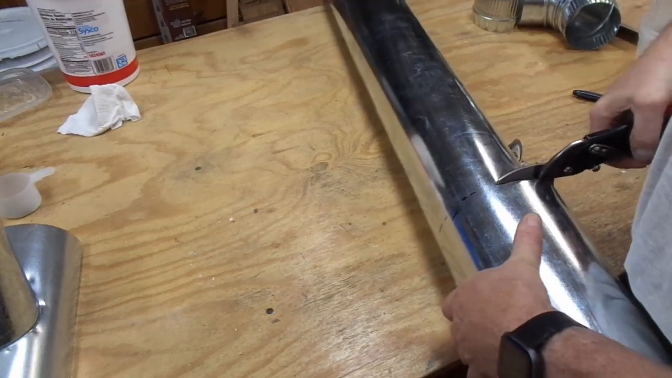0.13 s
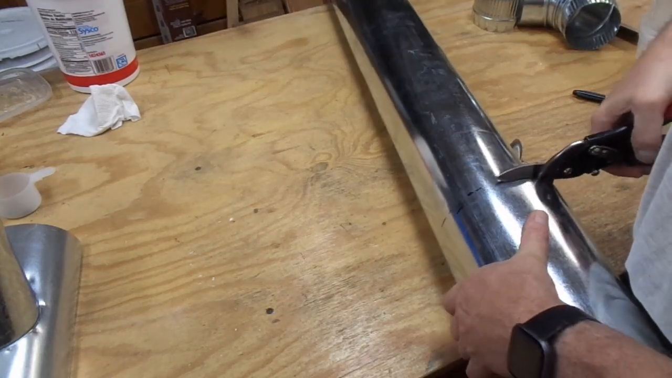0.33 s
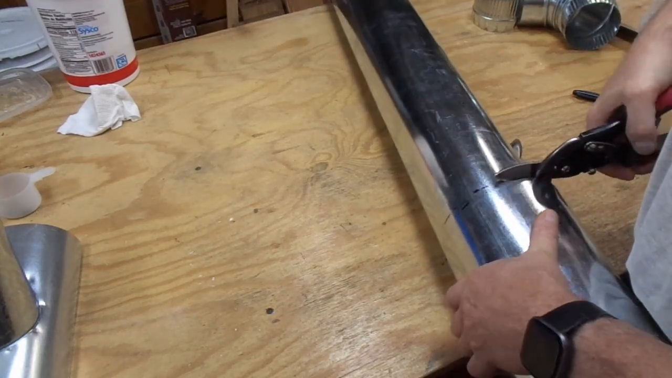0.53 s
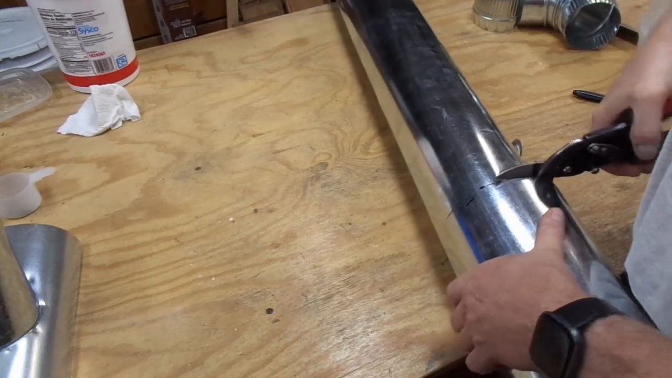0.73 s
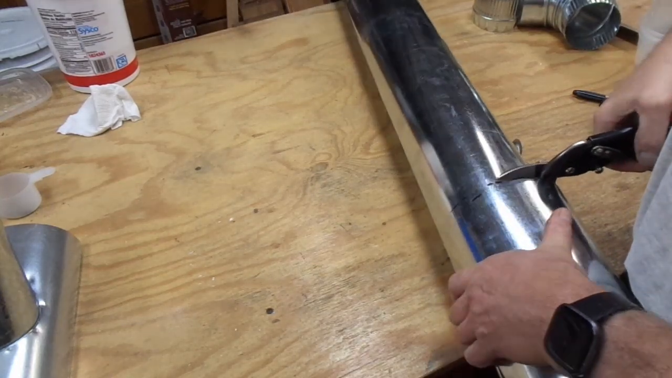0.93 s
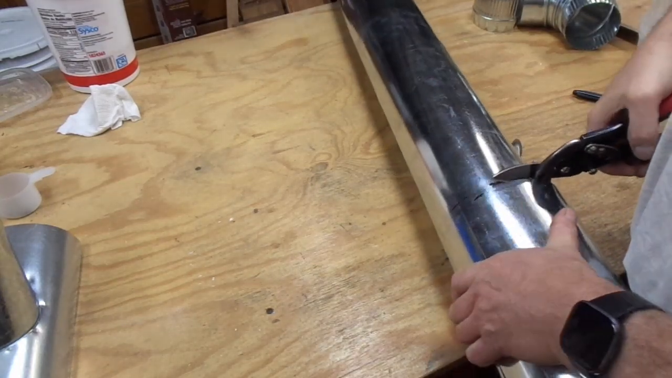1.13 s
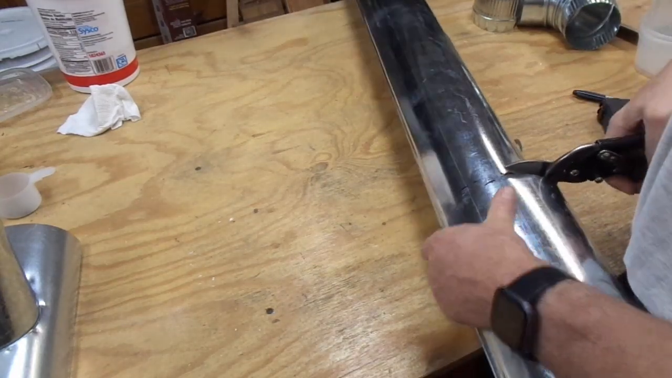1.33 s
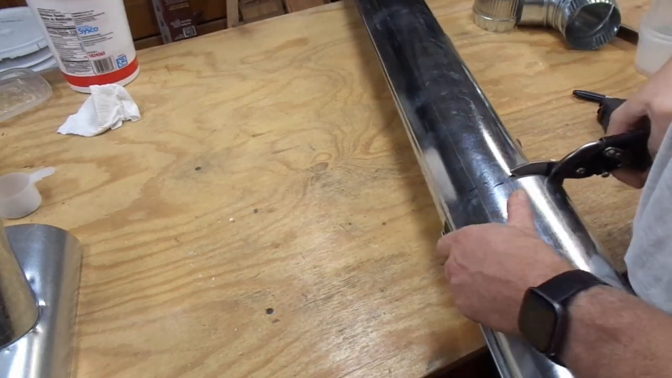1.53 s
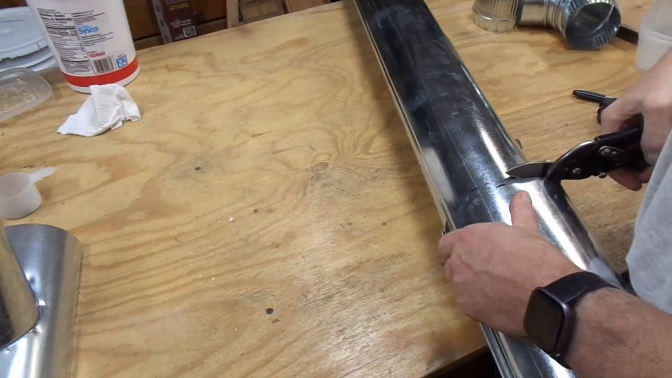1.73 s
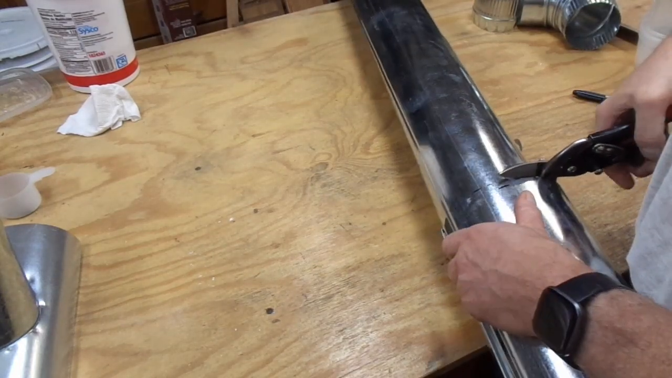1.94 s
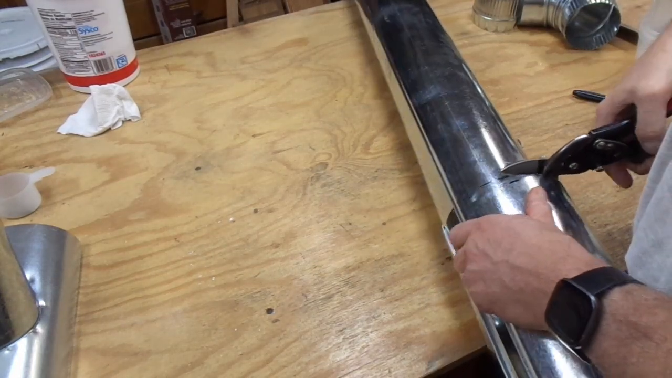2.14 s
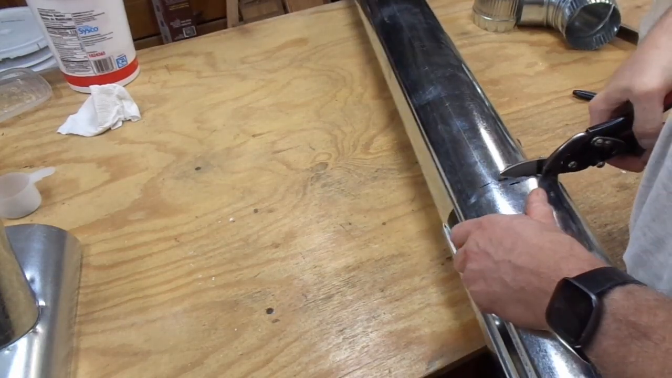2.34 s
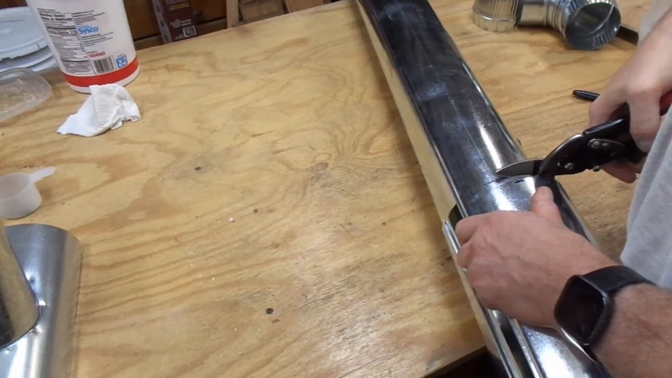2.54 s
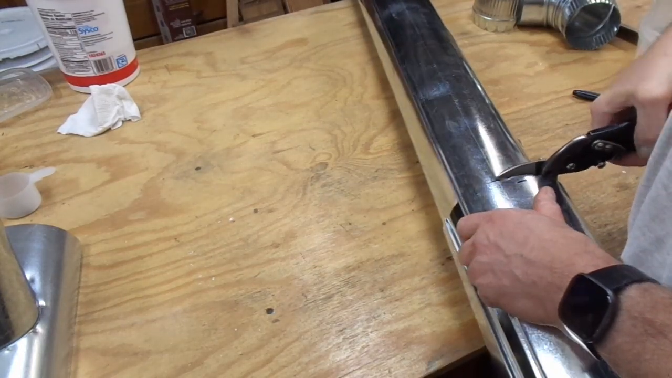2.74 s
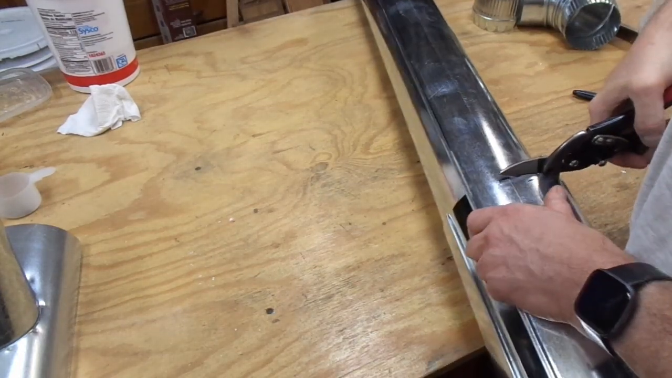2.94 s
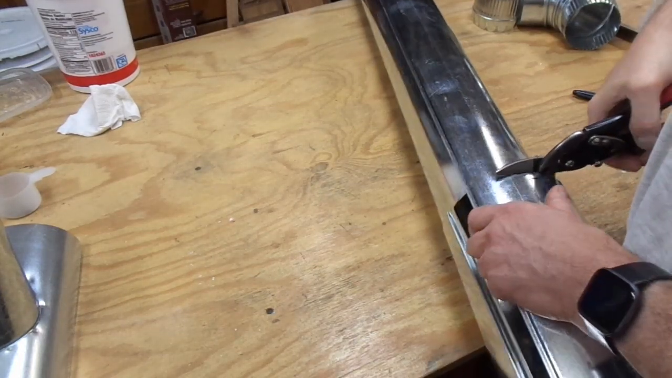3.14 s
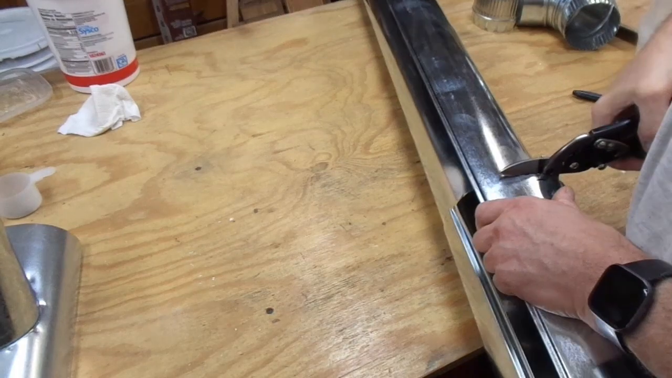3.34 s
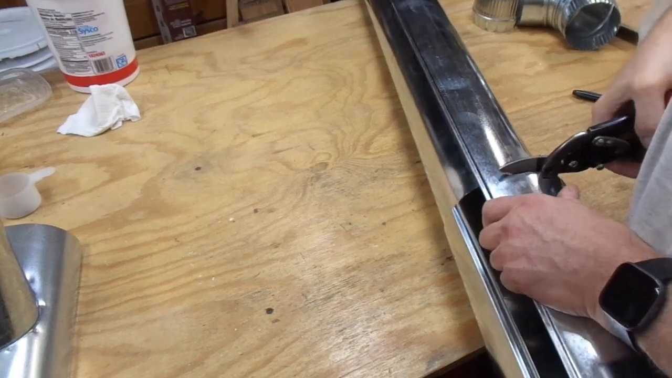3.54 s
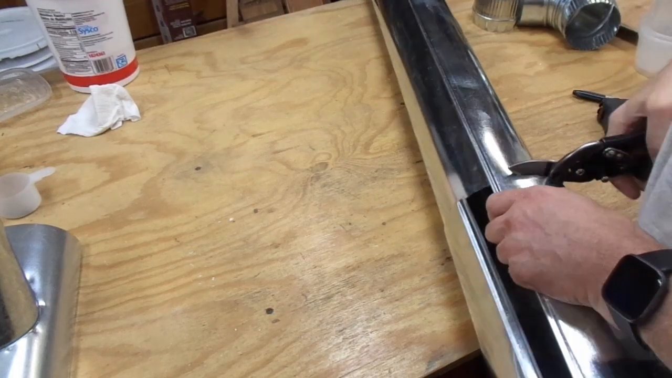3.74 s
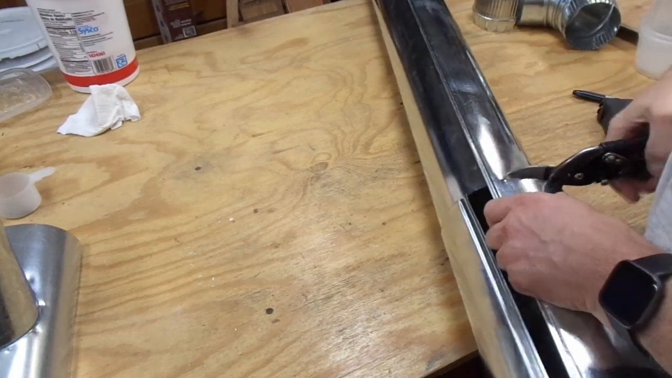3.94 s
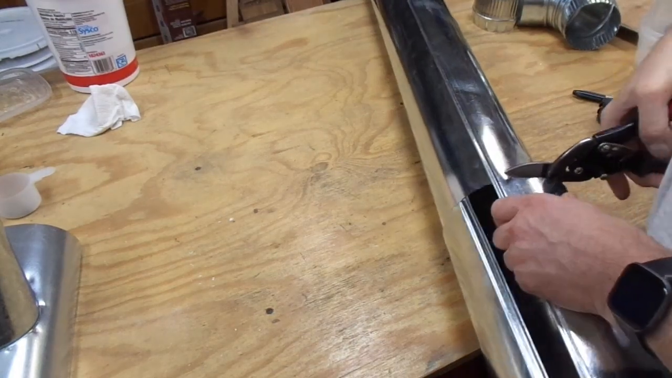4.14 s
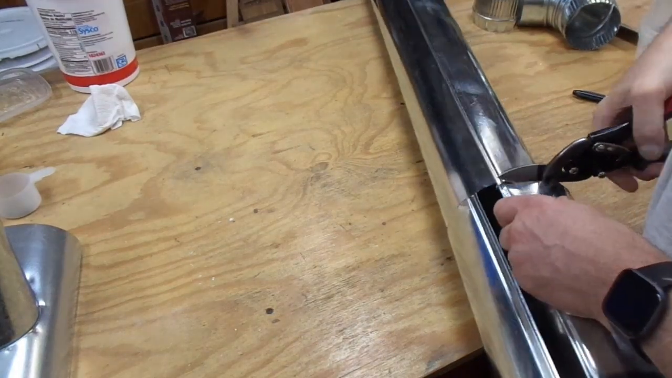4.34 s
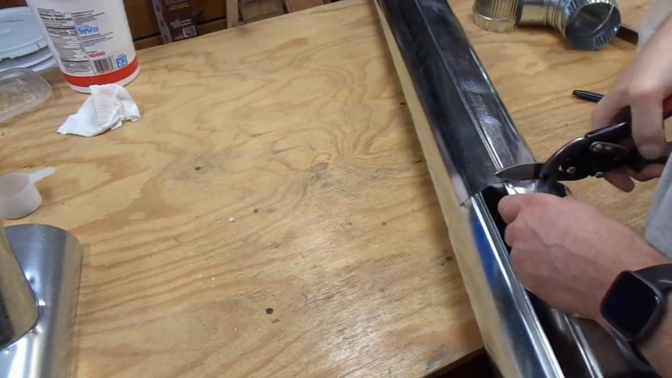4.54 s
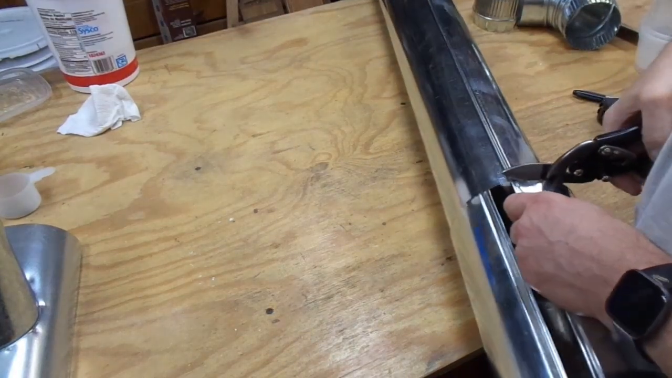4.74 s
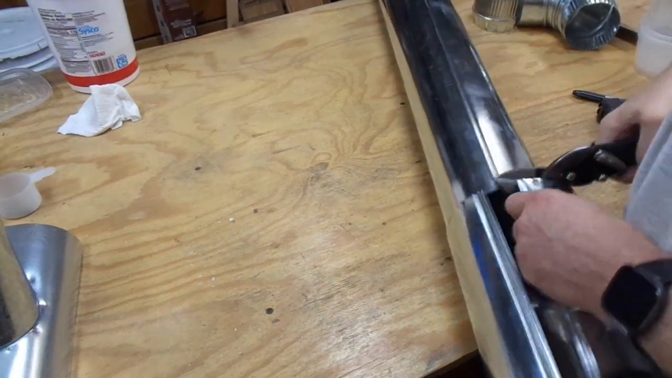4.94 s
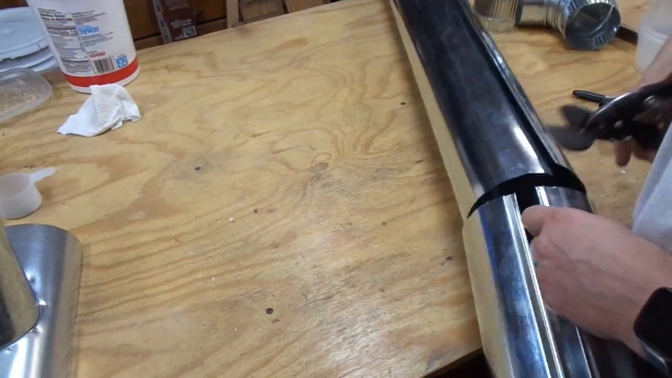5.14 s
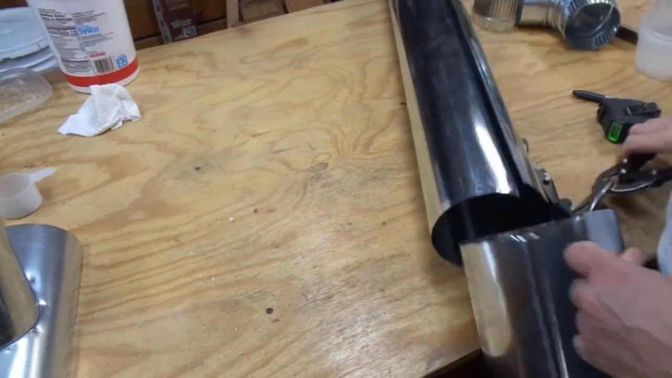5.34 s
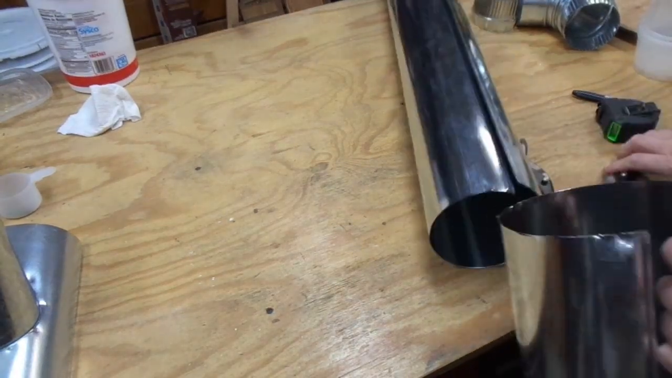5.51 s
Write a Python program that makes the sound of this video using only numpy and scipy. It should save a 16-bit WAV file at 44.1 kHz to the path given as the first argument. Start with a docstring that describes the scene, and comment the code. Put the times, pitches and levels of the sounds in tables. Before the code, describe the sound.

In a small workshop, hand snips chew through a thin metal duct pipe, heard close by as a run of short, gritty crunches and rasps with a couple of dull knocks. The cutting grows louder and pops through a folded seam. A sharp crack and loud snap free the two halves, which ring as they scrape and clank together, before one drops briefly onto the plywood bench.

```python
"""Hand snips cut round a thin steel duct pipe that lies on a plywood bench in a small workshop.
Push and squeeze alternate, each a burst of stick-slip impulses that rings the hand-damped shell;
the blades rasp and squeak, and later the pipe knocks on the bench. The jaws pop through the folded seam;
near 5 s it gives a short sharp crack and at once parts with a loud snap. The freed halves ring longer
as they scrape and clank past each other, and the long one drops on the bench."""
import sys
import numpy as np
from scipy import signal
from scipy.fft import rfft, irfft, next_fast_len
from scipy.io import wavfile

SR = 44100
rng = np.random.default_rng(int(sys.argv[2]) if len(sys.argv) > 2 else 0)


def digitize_waveform(pressure):
    """Quantize a signal to 16-bit integers and store it at the path in sys.argv[1].

    Rows of a 2-D input are taken as channels; values are limited to [-1, 1].
    """
    field = np.atleast_2d(pressure).T
    bounded = np.clip(field, -1, 1)
    quanta = np.round(bounded * 32767).astype(np.int16)
    wavfile.write(sys.argv[1], SR, quanta)


N = 250047
TIME = np.arange(N) / SR
RING_SIZE = 16384
RING_TIME = np.arange(RING_SIZE) / SR

# Normal modes of the held pipe, the loose halves and the plywood top.
# Each row: frequency in Hz, level in dB above the dense ringing, T60 in seconds.
HELD_MODES = [(272.04, 14, 0.1772), (671, 3, 0.0919), (1239.5, -6, 0.02967), (1621.5, 0, 0.03795),
              (2917.1, 4.5, 0.1296), (4562.9, -1, 0.0669), (5548.6, 2.5, 0.03933)]
LOOSE_MODES = [(275.2, 3.243, 0.443), (409.52, 4.062, 0.1013), (653.49, 11.616, 0.2944),
               (670.07, 7.276, 0.2833), (794.24, 4.073, 0.2883), (925.44, 9.136, 0.3388),
               (1049.1, 4.64, 0.298), (1186.1, 5.49, 0.3063), (1244.5, 4.054, 0.552), (1564.4, 3.96, 0.286),
               (1869.9, 4.78, 0.082), (1985, 6.494, 0.146), (2948.3, 3.066, 0.05524),
               (3068.3, 3.11, 0.2555), (3515, 3.77, 0.1394), (5636.2, 2.673, 0.1025),
               (5769.8, 8.535, 0.0465), (6436, 5.59, 0.0784)]
BENCH_MODES = [(97.81, 16.5, 0.0623), (665.22, 0.5, 0.0308)]
# Spectral envelopes of the shell. Each row: frequency in Hz, relative level in dB.
HELD_COLOUR = [(30, -38), (85, -27), (150, -24), (200, -16), (260, -5), (400, -1.5), (520, -6.5), (720, -7),
               (1100, -11.5), (3000, -17.5), (5400, -28), (6500, -33), (11000, -35), (15000, -48)]
LOOSE_COLOUR = [(30, -29), (85, -11.5), (135, -18), (180, -19), (260, 1), (330, 1.5), (430, -1), (560, -3),
                (750, -1.5), (1500, -7), (3500, -10.5), (5600, -18.5), (7000, -26.5), (11000, -24),
                (15000, -35)]
# Damping of the dense ringing. Each row: frequency in Hz, T60 in seconds.
HELD_DECAY = [(260, 0.11064), (1500, 0.08326), (10000, 0.05525)]
LOOSE_DECAY = [(500, 0.20175), (2700, 0.13475), (10000, 0.0208)]


def from_db(db):
    """Amplitude grows tenfold for every 20 dB."""
    return 10 ** (np.asarray(db) / 20)


def root_energy(x):
    """Signal energy is the sum of squares; this is its root."""
    return np.sqrt(np.sum(x ** 2) + 1e-20)


def unit_energy(x):
    """Normalisation to an energy of one."""
    return x / root_energy(x)


def add(out, sound, start):
    """Superposition: a sound adds in from a given sample on."""
    out[start:start + len(sound)] += sound[:len(out) - start]


def at_hz(points, hz):
    """Interpolation on a logarithmic frequency axis."""
    known_hz, values = np.transpose(points)
    return np.interp(np.log(np.maximum(hz, 1)), np.log(known_hz), values)


def band(x, low, high, order=3):
    """Butterworth band-pass filtering between two frequencies in Hz."""
    return signal.sosfilt(signal.butter(order, [low, high], "band", fs=SR, output="sos"), x)


def coloured(x, colour):
    """Minimum-phase filtering: folding the cepstrum makes the given spectrum causal."""
    size = 2 * next_fast_len(len(x))
    gain = from_db(at_hz(colour, np.fft.rfftfreq(size, 1 / SR)))
    cepstrum = irfft(np.log(gain))
    cepstrum[1:size // 2] *= 2
    cepstrum[size // 2 + 1:] = 0
    return irfft(rfft(x, size) * np.exp(rfft(cepstrum)))[:len(x)]


def free_decay(t60):
    """A damped vibration falls exponentially, by 60 dB in t60 seconds."""
    return np.exp(-np.log(1000) * RING_TIME / t60)


def dense_ring(decay):
    """Modal overlap: countless modes merge into noise, each octave dying at its own rate."""
    edges_hz = np.geomspace(30, 20000, 10)
    out = 0
    for low, high in zip(edges_hz, edges_hz[1:]):
        fade = unit_energy(free_decay(at_hz(decay, np.sqrt(low * high))))
        out = out + fade * band(rng.standard_normal(RING_SIZE), low, high, order=2)
    return unit_energy(out)


def shell(modes, colour, decay, crack_db):
    """Impulse response of one spot, in four bands: direct crack, dense ringing and normal modes."""
    # The bands are flexing, knock, crunch and edge hiss. Each row: lower and upper edge in Hz.
    bands = [(25, 430), (430, 1300), (1300, 5700), (5700, 17000)]
    response = dense_ring(decay)
    response[0] += from_db(crack_db)
    for hz, db, t60 in modes:
        fade = free_decay(t60)
        response += 2 * from_db(db) * fade / fade.sum() * np.cos(2 * np.pi * hz * RING_TIME)
    response = coloured(response, colour)
    return [band(response, low, high) for low, high in bands]


def slips(size, per_s, spread_db):
    """Stick-slip friction: steel on steel gives random impulses of log-normal size."""
    sizes = from_db(spread_db * rng.standard_normal(size)) * rng.choice([-1, 1], size)
    return sizes * (rng.random(size) < per_s / SR)


def shake(spot, force, levels_db, per_s, spread_db):
    """Convolution: every slip rings the shell; force and level set the energy in each band."""
    clicks = force * slips(len(force), per_s, spread_db)
    return root_energy(force) * sum(from_db(db) * unit_energy(signal.fftconvolve(clicks, response))
                                    for db, response in zip(levels_db, spot))


def stroke(spot, crest, length, rise_share, levels_db, per_s, spread_db):
    """Transient excitation by a skewed Gaussian swell of force; gives the sound and its first sample."""
    rise = length * np.clip(rise_share, .05, .95)
    fall = length - rise
    near = np.flatnonzero((TIME > crest - 2 * rise) & (TIME < crest + 2 * fall))
    since = TIME[near] - crest
    force = np.exp(-(since / np.where(since < 0, rise, fall)) ** 2)
    return shake(spot, force, levels_db, per_s, spread_db), near[0]


def strokes(rows, shape, spots, per_s, spread_db):
    """Response depends on the driving point: strokes of one shape take the given spots in turn."""
    boom_loss_db_per_s = 1.5381   # the held pipe booms less as the slit grows
    rise_share, flexing_db, *upper_db = shape
    out = np.zeros(N)
    for k, (crest, length, db) in enumerate(rows):
        levels_db = db + np.array([flexing_db - boom_loss_db_per_s * crest, *upper_db])
        add(out, *stroke(spots[k % len(spots)], crest, length, rise_share, levels_db, per_s, spread_db))
    return out


def still_air(rms_db):
    """The ambient noise floor is steady, coloured Gaussian noise."""
    # Each row: frequency in Hz, relative level in dB.
    air_colour = [(25, -7), (60, -11.5), (160, -10), (270, -6), (600, -2.5), (1200, -7), (2000, -11.5),
                  (4000, -14.5), (7000, -17.5), (12000, -18), (15000, -19)]
    return from_db(rms_db) * np.sqrt(N) * unit_energy(coloured(rng.standard_normal(N), air_colour))


def workshop(x, wet_db):
    """Diffuse reverberation: the cluttered walls return a weak tail after 12 ms."""
    # Each row: frequency in Hz, reverberation time in seconds.
    room_decay = [(1500, 0.3606), (10000, 0.1083)]
    walls = dense_ring(room_decay) * (RING_TIME > .012)
    return x + from_db(wet_db) * signal.fftconvolve(x, walls)[:N]


def handling(spot):
    """Sparse slips under a steady force: the sheet creaks faintly as the hand shifts."""
    # The four band levels in dB.
    levels_db = (-69, -59.5, -63.5, -75)
    return shake(spot, np.ones(N), levels_db, per_s=120, spread_db=4.5)[:N]


def squeaking():
    """Self-excited vibration: slips of blade on cut edge lock briefly into a wavering tone."""
    # Each row: centre in seconds, half length in seconds, frequency in Hz, level in dB.
    squeaks = [(0.492, 0.005804, 5378, -55), (2.087, 0.0097, 1568, -38), (2.73, 0.0068, 1710, -41.5),
               (3.434, 0.0049, 3166, -40), (3.867, 0.001315, 4279, -44), (4.492, 0.006976, 1944, -38),
               (4.611, 0.002736, 4388, -53.5)]
    out = np.zeros(N)
    for centre, half_length, hz, db in squeaks:
        since = TIME[np.abs(TIME - centre) < 3 * half_length] - centre
        phase_drift = np.cumsum(0.057 * rng.standard_normal(len(since)))
        tone = np.sqrt(2) * np.sin(2 * np.pi * hz * since + phase_drift)
        swell = np.exp(-(since / half_length) ** 2)
        add(out, from_db(db) * tone * swell, round((centre + since[0]) * SR))
    return out


def knocking():
    """An impact excites both bodies: the rocking pipe and the plywood ring dully together."""
    # Each row: crest in seconds, length in seconds, level in dB.
    knocks = [(3.166, 0.013, -25), (3.926, 0.017, -28.5)]
    # The rising share of the length, then four band offsets in dB.
    knock_shape = (0.1192, -4.5, 0, -13, -25)
    spot = shell(HELD_MODES + BENCH_MODES, HELD_COLOUR, HELD_DECAY, crack_db=3.5)
    return strokes(knocks, knock_shape, [spot], per_s=2500, spread_db=4.5)


def drop():
    """Contact damping: the long half lands on the plywood with a short hollow clunk."""
    # Crest and length in seconds, rising share of the length, then four band levels in dB.
    landing = (5.552, .011, .6, -27, -17.5, -31, -56)
    crest, length, rise_share, *levels_db = landing
    spot = shell(LOOSE_MODES + BENCH_MODES, LOOSE_COLOUR, HELD_DECAY, crack_db=6.5)
    out = np.zeros(N)
    add(out, *stroke(spot, crest, length, rise_share, levels_db, per_s=2700, spread_db=0))
    return out


def rasping():
    """Sliding friction on each other and on the fresh edge rings the blades along with the pipe."""
    # Each row: crest in seconds, length in seconds, level in dB.
    rasps = [(.484, .022, -46), (.801, .017, -42.5), (1.2, .06, -50.5), (1.602, 0.03807, -42.5),
             (1.633, 0.025657, -40.5), (1.896, .018, -45.5), (2.105, 0.02271, -43), (2.166, .026, -36),
             (2.203, .014, -43.5), (2.252, .008, -46.5), (2.453, .028, -38), (2.507, .032, -37),
             (2.848, .021, -43.5), (3.023, .018, -49.5), (3.185, .019, -37.5), (3.222, .013, -39.5),
             (3.54, .034, -43), (3.58, .048, -46), (3.671, .042, -46), (3.866, .003, -45),
             (4.024, .024, -39), (4.062, 0.028, -51), (4.206, 0.015, -39), (4.252, 0.03438, -39)]
    # The rising share of the length, then four band offsets in dB.
    rasp_shape = (.42, -3.5, -0.5, 0, -6)
    # Each row: frequency in Hz, level in dB above the dense ringing, T60 in seconds.
    blade_modes = [(4730.5, 13.5, 0.03665), (5120.6, 11.5, .05), (5680, 4, .06), (8040, 1, .03)]
    spots = [shell(HELD_MODES + blade_modes, HELD_COLOUR, HELD_DECAY, crack_db=1.5) for _ in range(5)]
    return strokes(rasps, rasp_shape, spots, per_s=2500, spread_db=4.2)


def crack_and_clanks():
    """Free vibration: a short sharp crack just before the snap, then the loose halves scrape and clank."""
    # Each row: crest in seconds, length in seconds, level in dB, sharpness in dB. The crack is first.
    bursts = [(4.9645, 0.003315, -27, 4.5), (5.02, .032, -20, -3), (5.095, 0.028417, -26.5, .5),
              (5.155, 0.028126, -32.5, -3.5), (5.237, 0.02418, -42.5, -1.5), (5.306, 0.03567, -19.5, -.5),
              (5.357, 0.035555, -11, -0.5), (5.39, 0.02004, -19, 3), (5.416, .032, -19.5, -13.5),
              (5.452, 0.03, -28, 4), (5.486, 0.032554, -29, 2), (5.518, 0.015, -25.5, 1.5),
              (5.62, .055, -39.5, -2)]
    # The rising share of the length, then four band offsets in dB.
    burst_shape = (0.1713, -11.5, 0, -3.5, -12.5)
    # The gain of each band in dB per dB of sharpness: sharper is brighter.
    sharpness_tilt = (-0.312, 0.0074, 0.7275, 2.142)
    spots = [shell(LOOSE_MODES, LOOSE_COLOUR, LOOSE_DECAY, crack_db=-3.0) for _ in range(5)]
    rise_share, *balance_db = burst_shape
    out = np.zeros(N)
    for k, (crest, length, db, sharpness_db) in enumerate(bursts):
        spot = spots[k % len(spots)]
        levels_db = db + np.array(balance_db) + sharpness_db * np.array(sharpness_tilt)
        add(out, *stroke(spot, crest, length, rise_share, levels_db, per_s=2000, spread_db=2.0))
    return out


def cutting():
    """Forced vibration: the jaws and the holding hand drive the damped shell with bursts of slips."""
    # Each row: crest in seconds, length in seconds, level in dB.
    pushes = [(.164, 0.03151, -41), (.436, 0.030597, -39), (.709, 0.029084, -36), (.914, 0.03786, -44),
              (1.506, 0.042244, -38), (1.831, 0.03626, -40.5), (2.053, 0.01, -44), (2.09, 0.031933, -36),
              (2.424, 0.0427, -39), (2.752, .054, -39), (3.088, 0.035703, -35.5), (3.425, 0.033, -37),
              (3.899, 0.03883, -35), (4.208, 0.018955, -36)]   # the open jaws slide on into the slit
    cuts = [(.056, 0.021393, -40.5), (.235, 0.02324, -33.5), (.528, .04, -36), (.778, .045, -35),
            (.976, .02, -37), (1.083, .035, -38), (1.592, 0.048545, -36.5), (1.895, 0.03959, -37),
            (2.155, 0.026535, -34.5), (2.505, .036, -34.5), (2.828, .032, -32), (3.185, .024, -37.5),
            (3.513, .04, -34), (3.986, 0.03073, -32), (4.058, 0.026, -28), (4.091, .03, -32),
            (4.505, .036, -30)]   # a squeeze shears the sheet
    bumps = [(1.163, 0.02552, -52), (2.002, 0.011827, -48.5), (3.743, 0.035955, -46), (4.115, 0.045, -43),
             (4.344, 0.03968, -49), (4.634, 0.014093, -45), (4.676, 0.012, -50), (4.737, 0.043, -48.5),
             (4.86, 0.04327, -49), (4.941, 0.02746, -47)]   # the pipe gives under the hand
    jolts = [(4.244, .011, -18), (4.418, .013, -24)]   # the jaws pop through the folded seam
    # Each shape: the rising share of the length, then four band offsets in dB.
    push_shape = (0.3753, -1.5, 0.5, -5.5, -20.5)
    cut_shape = (0.439, 1.5, 0, -6.5, -18.5)
    bump_shape = (0.5492, 9.5, 2.5, -4, -17)
    jolt_shape = (.5, -4, 0, -6, -25.5)
    # A push creaks more than it hisses. Each row: frequency in Hz, gain in dB.
    push_tint = [(1000, 0.5), (1650, 4), (3200, 1), (5000, 1.5), (7000, 1)]
    spots = [shell(HELD_MODES, HELD_COLOUR, HELD_DECAY, crack_db=0.5) for _ in range(11)]
    return (handling(spots[0])
            + coloured(strokes(pushes, push_shape, spots, per_s=3000, spread_db=3.5), push_tint)
            + strokes(cuts, cut_shape, spots[::-1], per_s=3000, spread_db=2.5)
            + strokes(bumps, bump_shape, spots, per_s=3000, spread_db=5.0)
            + strokes(jolts, jolt_shape, spots, per_s=2900, spread_db=4.0))


def snap():
    """Sudden release of strain: the last of the seam tears and the shell springs free."""
    # Start in seconds, time constant of the tearing in seconds, then four band levels in dB.
    tear = (4.9674, 0.014, -13.5, -3, 1.2, -5)
    start, fade, *levels_db = tear
    spot = shell(LOOSE_MODES, LOOSE_COLOUR, LOOSE_DECAY, crack_db=3.0)
    force = np.exp(-RING_TIME / fade)
    out = np.zeros(N)
    add(out, shake(spot, force, levels_db, per_s=8000, spread_db=1.5), round(start * SR))
    return out


def scene():
    """Snips, pipe and their reverberation superpose on the still air, in one channel."""
    air = still_air(rms_db=-54.5)
    metal = cutting() + rasping() + knocking() + squeaking() + snap() + crack_and_clanks() + drop()
    return (workshop(metal, wet_db=-14.0) + air)[None]


def record(dry):
    """Soft saturation: the snap overloads the microphone; a steep low-pass then cuts the top."""
    ceiling, cutoff_hz = 0.63, 15250
    clipped = dry / (1 + (dry / ceiling) ** 6) ** (1 / 6)
    return signal.sosfilt(signal.ellip(10, .2, 90, cutoff_hz, fs=SR, output="sos"), clipped)


dry = scene()
out = record(dry)
digitize_waveform(out)
```